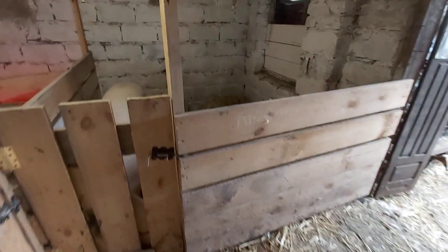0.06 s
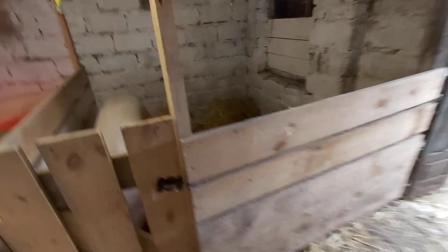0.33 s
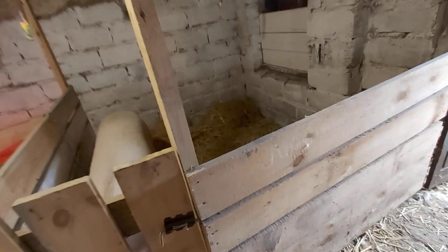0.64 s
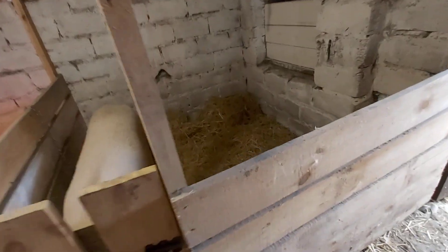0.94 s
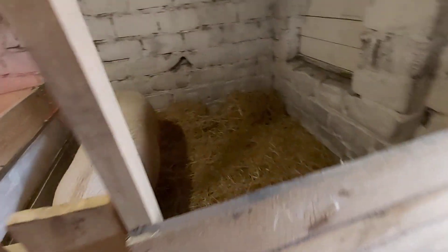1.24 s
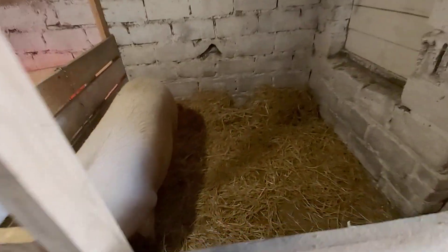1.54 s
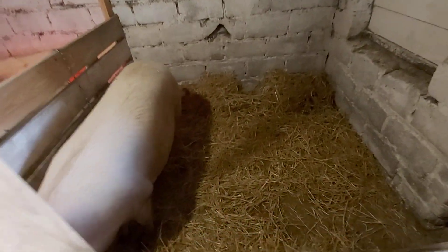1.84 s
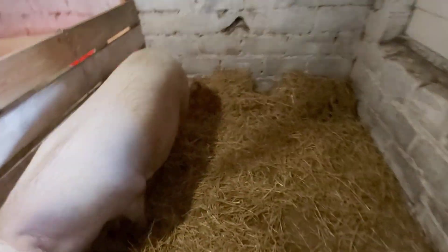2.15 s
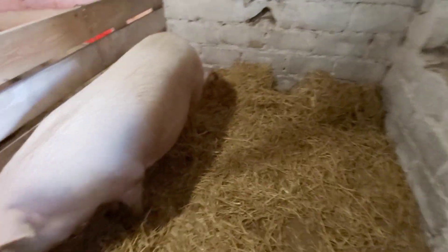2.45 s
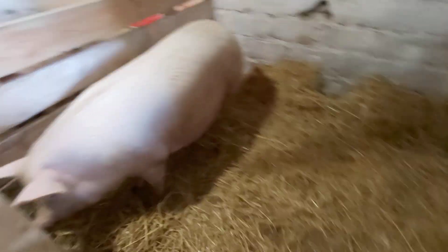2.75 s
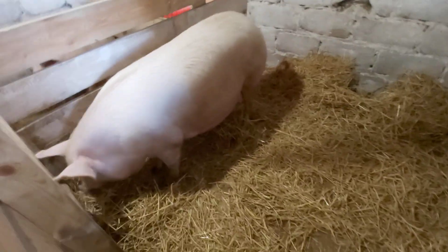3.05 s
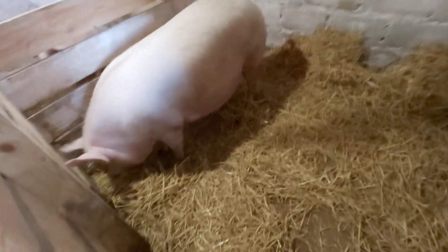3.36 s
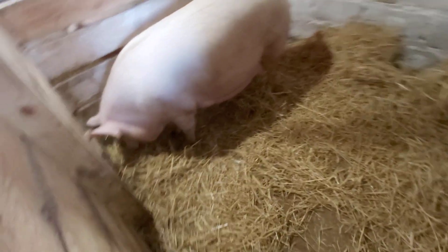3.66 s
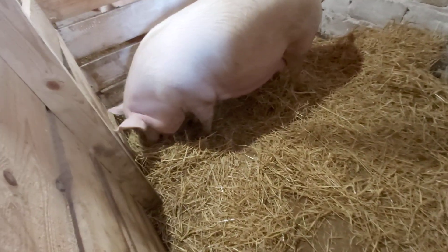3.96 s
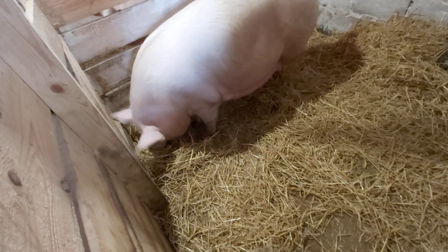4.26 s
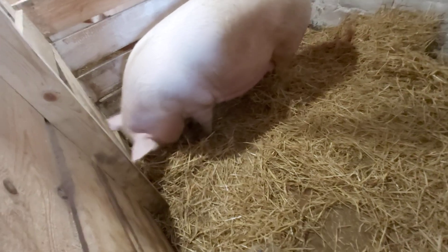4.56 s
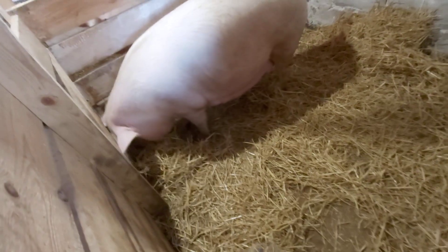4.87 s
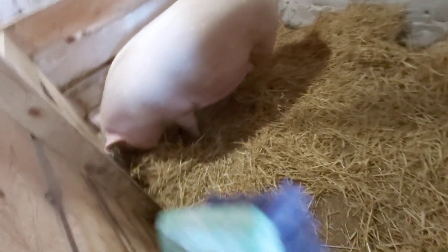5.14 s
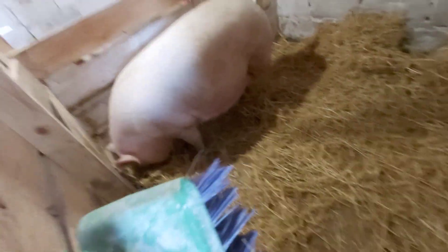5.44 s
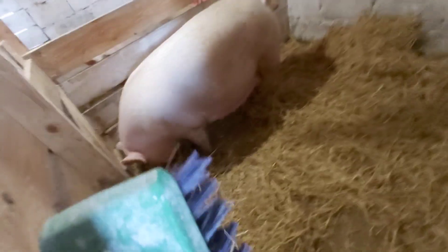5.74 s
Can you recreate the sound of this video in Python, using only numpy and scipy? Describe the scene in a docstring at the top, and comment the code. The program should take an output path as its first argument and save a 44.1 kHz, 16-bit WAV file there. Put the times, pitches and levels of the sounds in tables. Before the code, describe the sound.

A pig grunts in quick succession in a barn pen, with a few wooden knocks, then roots and snuffles in rustling straw.

```python
"""A sow in a brick barn pen starts with a quick run of grunts; the wooden pen is knocked, its gate squeaks.
Each grunt begins as a nasal hum, opens into a rasp and ends in a slow chest flutter that booms in the room.
After 2 s she grunts only now and then as she roots, and the pen takes two more knocks.
From about 4 s she snuffles softly, and the straw rustles louder under her snout and feet."""
import sys
import numpy as np
from scipy import signal
from scipy.fft import rfft, irfft, next_fast_len
from scipy.io import wavfile

SR = 44100
rng = np.random.default_rng(int(sys.argv[2]) if len(sys.argv) > 2 else 0)


def pcm_store(signal):
    """Save signal as 16-bit PCM."""
    levels = np.round(np.clip(np.atleast_2d(signal), -1, 1) * 32767)
    wavfile.write(sys.argv[1], SR, levels.astype(np.int16).T)


N = 264581
TIME = np.arange(N) / SR

# snout resonances, the rasp and its bright edge: f/Hz, width/Hz, level/dB
RASP_MODES = [(1828, 190, 0), (2073, 166, 0)]
EDGE_MODES = [(2570, 280, 3.5), (2890, 340, -4.5), (3160, 590, -6.5), (3800, 370, -15.5), (5890, 390, -5.5),
              (8600, 1200, -19), (9900, 1800, -19)]


def grunt(t, rise_s, fall_s, lag_s, start_hz, end_hz, rough,
          chest_db, nose_db, throat_db, mouth_hz, mouth_db, snout_scale, rasp_db):
    """Slack folds slap unevenly, slowing down; each slap lets a puff of air through nose and mouth."""
    # airway resonances: f/Hz, width/Hz, level/dB
    nose_modes = [(160.8, 49, 1.5), (227.2, 144, 3.5), (310, 350, -1)]
    throat_modes = [(467, 70, 7), (673, 89, 16), (726, 290, -26)]
    pitch_hz = end_hz + (start_hz - end_hz) * (1 - np.tanh((t - .012) / .03)) / 2
    cycles = np.cumsum(pitch_hz * (1 + .22 * rough * drift(len(t), 110))) / SR
    cycles -= np.interp(0, t, cycles)  # one slap falls on the peak, t = 0
    pulses = np.diff(np.floor(cycles), prepend=np.floor(cycles[0]))
    slaps = unit(pulses * amp(2 * drift(len(t), 120)))
    puffs = unit((.35 + np.exp(-(cycles % 1) / .2)) * rng.standard_normal(len(t)))
    drive = np.sqrt(1 - rough) * slaps + np.sqrt(rough) * puffs

    lift = max(start_hz / 95.2, 1) ** .32  # nose resonances rise in higher grunts
    nose = amp(nose_db) * resonate(drive, [(hz * lift, width, db) for hz, width, db in nose_modes])
    hum = nose * swell(t, 1.2 * rise_s, 1.555 * fall_s)
    hum += amp(throat_db) * resonate(drive, throat_modes) * swell(t, .62 * rise_s, .81 * fall_s)

    rasp = amp(mouth_db) * resonate(drive, [(mouth_hz, 170, 0)])
    rasp += amp(rasp_db) * resonate(drive, [(hz * snout_scale, width, db) for hz, width, db in RASP_MODES])
    rasp += amp(rasp_db - 8) * resonate(drive + .13 * puffs, EDGE_MODES)
    mouth_open = np.interp(t + .56 * rise_s, [0, .004], [.3, 1])

    flow = unit(np.cos(2 * np.pi * cycles) + .3 * np.cos(4 * np.pi * cycles))
    flow *= amp(3 * drift(len(t), 70))
    flow += .33 * resonate(puffs, [(63, 30, 0)])  # low rumble under each grunt
    chest = amp(chest_db) * flow * swell(t - lag_s, .02 + .5 * lag_s, 1.3 * fall_s)
    return hum + rasp * mouth_open * swell(t, 1.58 * rise_s, .56 * fall_s) + chest


def grunts():
    """The sow's calls, each placed by the peak of its rasp."""
    # t/s, rise/s, fall/s, chest lag/s, start pitch/Hz, end pitch/Hz, roughness/0-1,
    # chest/dB, nose/dB, throat/dB, mouth f/Hz, mouth/dB, snout resonance factor, rasp/dB
    calls = [ (.005, 0.035, 0.083, .007, 90.8, 67.8, 0.61, -47, -39.5, -41.5, 1210, -55, 1.17, -52),
             (0.341, .044, 0.051, 0.045, 112.3, 76.96, 0.38, -24, -20.5, -27, 1127, -24.5, 1.13, -31),
             (0.993, 0.047, 0.068, 0.018, 98.2, 76.4, 0.38, -28.5, -27, -29, 1340, -39.5, 1.02, -35.5),
             (1.18, .036, 0.037, 0.054, 135.2, 66.2, 0.53, -30.5, -23.5, -29.5, 1340, -30.5, 1.08, -28.5),
             (1.35, 0.032, 0.026, 0.04, 124.3, 75.4, 0.53, -28, -24, -30, 1350, -32.5, 1.02, -22),
             (1.526, .05, .034, 0.013, 87.2, 80.5, 0.47, -21, -23, -28, 1290, -28.5, 1.05, -27.5),
             (1.768, 0.036, 0.079, 0.014, 91.2, 82, 0.95, -42.5, -32.5, -45.5, 1320, -54, .95, -49),
             (2.022, 0.038, 0.071, 0.02, 103.3, 68.8, 0.32, -33.5, -33, -39, 1450, -43.5, 1.03, -40.5),
             (2.565, 0.06, 0.056, .003, 109.6, 101.7, 0.73, -44, -36, -42.5, 1850, -51, 0.96, -37),
             (3.285, 0.049, 0.068, 0.025, 97.9, 60.7, .36, -28.5, -29, -29, 1220, -38.5, 1.04, -37),
             (4.172, 0.069, 0.027, 0.0046, 96.6, 85.5, 0.24, -35.5, -34.5, -46, 1330, -49, 1.12, -44),
             (5.107, 0.06, 0.043, 0.037, 118.3, 108.6, 0.26, -31, -29.5, -33, 1200, -42.5, 1.02, -35),
             (5.346, .019, 0.021, 0.019, 149.6, 123.6, 0.31, -25.5, -22.5, -31.5, 906, -46, 1.2, -41),
             (5.772, 0.042, 0.053, 0.0054, 146.8, 128.3, 0.87, -39, -39.5, -48, 895, -36.5, 1.07, -38)]
    t = np.arange(-SR // 5, SR // 2) / SR
    mix = np.zeros(N)
    for peak_s, *voice in calls:
        add(mix, peak_s + t[0], grunt(t, *voice))
    return mix


def throat_catches():
    """The throat catches and lets go; each burst of air rings the snout resonances near its centre."""
    # t/s, level/dB, centre f/Hz
    catches = [(0.328, -19, 2550), (0.976, -22, 2200), (1.138, -29, 1900), (1.166, -22, 1950),
               (1.323, -21, 2700), (1.340, -19, 2900), (1.480, -18, 2900), (1.506, -17, 2400),
               (1.988, -32, 2150), (2.546, -37, 5450), (3.263, -32, 2200)]
    t = np.arange(SR // 20) / SR
    mix = np.zeros(N)
    for start_s, level_db, centre_hz in catches:
        modes = [(hz, width, max(-22 * abs(np.log2(hz / centre_hz)), -40) + db / 2)
                 for hz, width, db in RASP_MODES + EDGE_MODES]
        burst = resonate(rng.standard_normal(len(t)), modes)
        add(mix, start_s, amp(level_db) * burst * np.exp(-t / .007))
    return mix


def snuffles():
    """Unvoiced air flutters through throat and nostrils."""
    # peak t/s, width/s, throat/dB, nostrils/dB
    breaths = [(4.112, 0.032, -60, -41.5), (4.53, 0.11, -37.5, -43.5), (5.565, 0.048, -54, -42.5)]
    # resonances: f/Hz, width/Hz, level/dB
    throat_modes = [(650, 400, 0)]
    nostril_modes = [(1290, 210, 0), (1890, 620, -1)]
    air = rng.standard_normal(N) * amp(2.1 * drift(N, 80))
    throat, nostrils = resonate(air, throat_modes), resonate(air, nostril_modes)
    return sum((amp(throat_db) * throat + amp(nostril_db) * nostrils) * swell(TIME - s, width_s, width_s)
               for s, width_s, throat_db, nostril_db in breaths)


def pen_knocks():
    """Short clacks of wood on wood; the boards ring low."""
    # t/s, thud/dB, clack/dB
    knocks = [(.266, -21.5, -19.5), (.712, -66, -31.5), (.737, -22.5, -31), (1.747, -52, -32.5),
              (2.329, -40.5, -27), (5.546, -62, -36)]
    # f/Hz, level/dB, t60/s
    board_modes = [(110.4, 13, 0.045), (140.3, 2, 0.23), (174.4, -8.5, 0.33), (254, -5, 0.079),
                   (310, -7.5, 0.13)]
    clack_modes = [(544, 250, 2), (730, 950, 39), (1230, 1800, -19), (2600, 1800, -19)]
    t = np.arange(SR // 3) / SR
    thud = sum(amp(db - 60 * t / t60) * np.sin(2 * np.pi * hz * t) for hz, db, t60 in board_modes)
    thud *= 1 - np.exp(-t / .0074)
    mix = np.zeros(N)
    for start_s, thud_db, clack_db in knocks:
        clack = resonate(rng.standard_normal(len(t)), clack_modes) * np.exp(-t / .009)
        add(mix, start_s, amp(thud_db) * thud + amp(clack_db) * clack)
    return mix


def gate_squeak():
    """The gate rubs on its hinge and chirps once."""
    # f/Hz, width/Hz, level/dB
    hinge_modes = [(2277, 79, 2.5), (4180, 1100, -13), (4570, 190, -15)]
    rub = amp(-46) * swell(TIME - .512, .032, .0088)
    chirp = amp(-21) * swell(TIME - .528, .003, .006)
    return resonate(rng.standard_normal(N), hinge_modes) * (rub + chirp)


def rooting():
    """Dull scuffing of the snout deep in the bedding."""
    # peak t/s, level/dB, width/s
    shoves = [(.545, -35.5, 0.034), (2.13, -36, 0.038), (2.255, -37, 0.14), (3.52, -50, 0.075),
              (4.62, -41, 0.12), (4.8, -46, 0.044), (5.6, -50, 0.054), (5.775, -37.5, 0.097)]
    # f/Hz, density/dB
    scuff_spectrum = [(160, -11), (270, 6), (292, 2), (374, 2), (595, -1), (966, -10), (1370, -18),
                      (1530, -13.5), (4000, -25.5), (5200, -23.5), (8800, -120)]
    friction = rng.standard_normal(N) * amp(1.16 * drift(N, 60))
    return push_envelope(shoves) * colour(friction, scuff_spectrum)


def straw():
    """Thousands of tiny stalk cracks, in clumps, over a sliding hiss; now and then a stalk snaps."""
    # constant stirring, louder as she comes near: t/s, level/dB
    stirring_levels = [(0, -48), (.63, -65.5), (1.92, -62), (2.45, -57.5), (3, -55), (4, -42.5),
                       (4.95, -41.5), (5.24, -48.5), (6, -43)]
    # feet and snout: peak t/s, level/dB, width/s
    strokes = [(.04, -44.5, 0.18), (.43, -45, 0.12), (.78, -49, 0.15), (1, -48.5, 0.13), (1.2, -50, 0.08),
               (1.35, -53, 0.039), (1.535, -49.5, 0.081), (1.765, -58, 0.027), (1.845, -59, .02),
               (2.065, -49.5, 0.026), (2.16, -55.5, 0.063), (2.355, -52.5, 0.026), (2.54, -56, .06),
               (3.18, -40, 0.16), (3.795, -41, 0.062), (4.185, -33, 0.058), (4.45, -41.5, 0.23),
               (4.66, -35.5, 0.13), (4.79, -35.5, 0.033), (5.04, -38.5, 0.043), (5.365, -35.5, 0.058),
               (5.55, -40.5, 0.17), (5.78, -38, 0.054), (5.96, -35.5, 0.33)]
    # t/s, peak level/dB
    snaps = [(.275, -45), (.785, -46), (.825, -57), (.925, -43.5), (0.976, -39.5), (1.955, -59),
             (4.044, -35)]
    # f/Hz, density/dB
    rustle_spectrum = [(180, -13), (300, 1.5), (425, -18), (810, -2), (895, -5.5), (1310, -7.5), (1890, -5),
                       (2220, -5.5), (5010, -4), (5910, -1), (7090, -8.5), (12500, -4.5), (15700, -4)]
    cracks_per_s, snap_fade_s = 2500, .015
    cracks = (rng.random((2, N)) < cracks_per_s / SR) * rng.standard_normal((2, N))
    cracks *= amp(2.9 * np.minimum(rng.exponential(1, (2, N)), 5))
    rustle = .49 * unit(cracks + .037 * cracks[::-1]) + rng.standard_normal((2, N))
    stirring = amp(np.interp(TIME, *np.transpose(stirring_levels)))
    snapping = sum(amp(db) * (TIME > s) * np.exp(-abs(TIME - s) / snap_fade_s) for s, db in snaps)
    envelope = np.sqrt(stirring ** 2 + push_envelope(strokes) ** 2 + snapping ** 2)
    envelope *= amp(.87 * drift(N, 70))
    return envelope * colour(rustle, rustle_spectrum) * amp([[4.2], [1.2]])


def barn(source):
    """Direct sound, a dense echo off the brick walls, and standing waves that ring on."""
    # echo decay: f/Hz, t60/s
    decay_times = [(100, .45), (300, .45), (1000, .31), (3000, .24), (6000, .2), (12000, .17)]
    # echo spectrum: f/Hz, level/dB
    echo_levels = [(70, 2), (150, -6), (300, -3.5), (1000, -4.5), (3000, 3.5), (8000, -1)]
    # between walls and boards: f/Hz, width/Hz, level/dB
    standing_waves = [(80.5, 11, -2), (101, 36, -7.5), (236, 19, -4.5), (286, 24.6, -3.5), (620, 29, -7),
                      (1152, 24, 1), (1370, 46, -7), (1860, 63, -8), (2090, 60, -9)]
    reflections_per_s, predelay_s, right_lag_s = 4000, .003, .00022
    taps = rng.choice([-1., 1.], (2, SR)) * (rng.random((2, SR)) < reflections_per_s / SR)
    hz, t, bands = signal.stft(taps, SR, nperseg=512)
    t60 = read(decay_times, hz)[:, None]
    decay = amp(read(echo_levels, hz)[:, None] - 60 * t / t60) / np.sqrt(t60)
    tail = signal.istft(bands * decay, SR, nperseg=512)[1]
    tail /= np.linalg.norm(tail, axis=1, keepdims=True)
    bass = signal.butter(1, 170, fs=SR, output="sos")  # long waves reach both channels alike
    tail[1] += signal.sosfiltfilt(bass, tail[0] - tail[1], padtype=None)
    delayed = np.interp(TIME - predelay_s, TIME, source)
    echo = signal.fftconvolve(delayed[None], tail, axes=1)[:, :N]
    near = amp(-3) * source
    for mode_hz, width_hz, db in standing_waves:
        near += amp(db) * signal.lfilter(*signal.iirpeak(mode_hz, mode_hz / width_hz, fs=SR), source)
    stereo = np.array([near, np.interp(TIME - right_lag_s, TIME, near)])
    return (stereo + amp(-2.5) * echo) * amp([[2], [-2]])


def still_air():
    """Faint, steady noise of the quiet barn."""
    # f/Hz, density/dB
    air_spectrum = [(18, -55), (30, -24), (357, -11), (390, -12.5), (1030, -17.5), (6500, -23), (8450, -39),
                    (14300, -120)]
    return colour(rng.standard_normal((2, N)), air_spectrum) * amp([[-52], [-54.5]])


def push_envelope(pushes):
    """Pushes through the bedding swell and fade; their powers add."""
    return np.sqrt(sum((amp(db) * swell(TIME - s, width_s, 1.056 * width_s)) ** 2
                       for s, db, width_s in pushes))


def resonate(x, modes):
    """Steep parallel resonances (f/Hz, width/Hz, level/dB), summed to rms 1."""
    ringing = 0
    for hz, width_hz, db in modes:
        b, a = signal.iirpeak(hz, hz / width_hz, fs=SR)
        ringing += amp(db) * unit(signal.lfilter(b, a, signal.lfilter(b, a, x)))
    return unit(ringing)


def colour(x, spectrum):
    """Filters by a spectrum (f/Hz, level/dB), to rms 1."""
    size = next_fast_len(N)
    gain = amp(read(spectrum, np.fft.rfftfreq(size, 1 / SR)))
    return unit(irfft(rfft(x, size) * gain, size)[..., :N])


def swell(t, rise_s, fall_s):
    """A hump that peaks at t = 0."""
    return np.exp(-abs(t / np.where(t < 0, rise_s, fall_s)) ** 1.84)


def drift(length, rate_hz):
    """Straight lines between Gaussian draws."""
    return np.interp(np.arange(length) * rate_hz / SR, np.arange(2000), rng.standard_normal(2000))


def read(points, hz):
    """Interpolates on a log-frequency axis."""
    knots_hz, values = np.transpose(points)
    return np.interp(np.log(hz + 1), np.log(knots_hz + 1), values)


def add(mix, start_s, sound):
    """Adds a sound in place, cut to fit."""
    at = round(start_s * SR)
    sound = sound[max(-at, 0):]
    part = mix[max(at, 0):][:len(sound)]
    part += sound[:len(part)]


def amp(db):
    return 10 ** (np.asarray(db) / 20)


def unit(x):
    """Scales to rms 1."""
    return x / np.sqrt(np.mean(x ** 2) + 1e-20)


def scene():
    """Sow and pen in the barn, with straw and still air around."""
    pen = gate_squeak() + rooting() + snuffles() + grunts() + throat_catches() + pen_knocks()
    return still_air() + barn(pen) + straw()


def record(dry):
    """The microphone sheds the deepest bass; then the band limit."""
    low_hz, high_hz = 38, 15950
    thinned = signal.sosfilt(signal.butter(2, low_hz, "highpass", fs=SR, output="sos"), dry)
    lowpass = signal.firwin(511, high_hz, window=("kaiser", 9), fs=SR)
    return signal.oaconvolve(thinned, lowpass[None], "same")


dry = scene()
out = record(dry)
pcm_store(out)
```